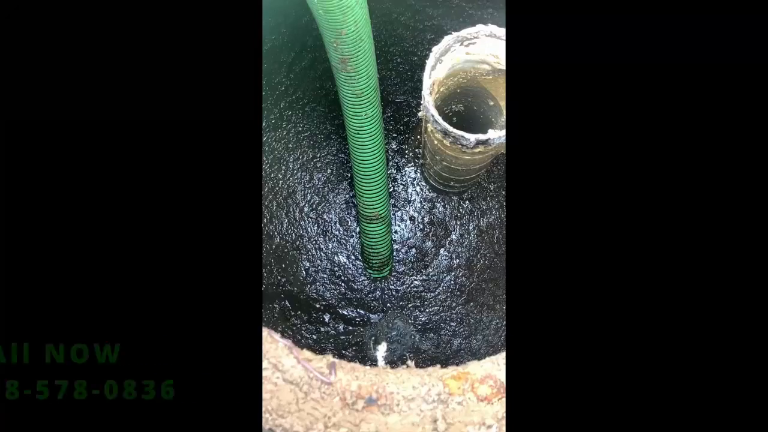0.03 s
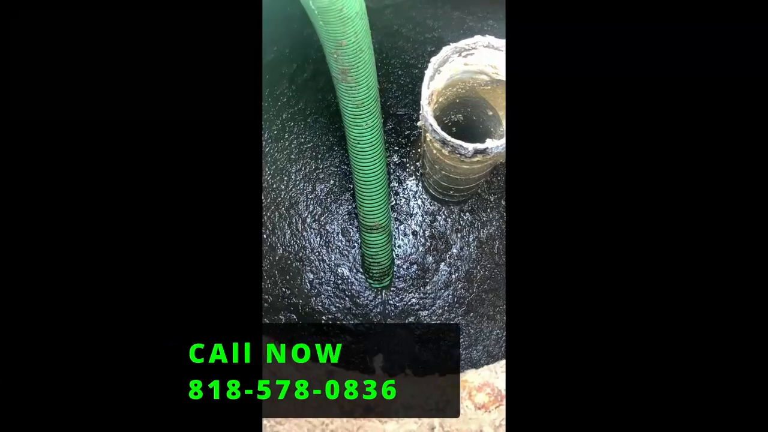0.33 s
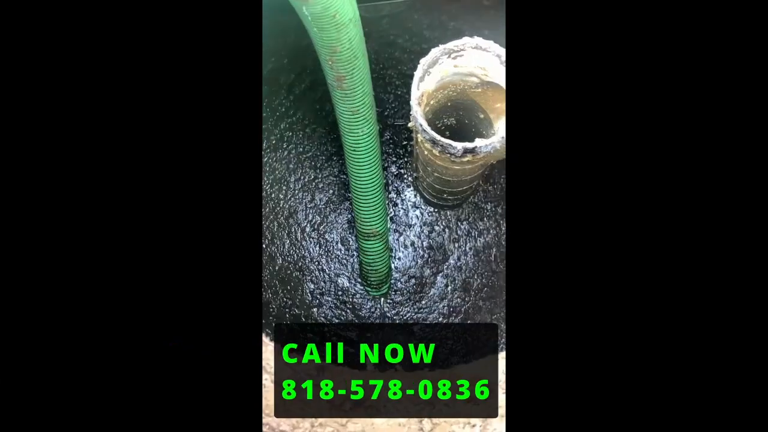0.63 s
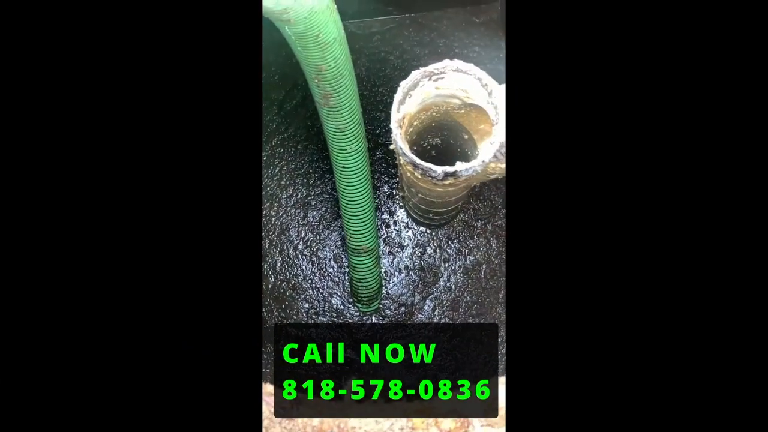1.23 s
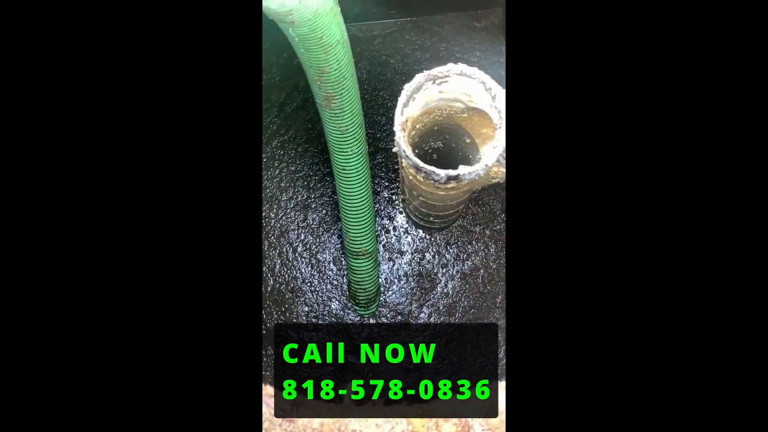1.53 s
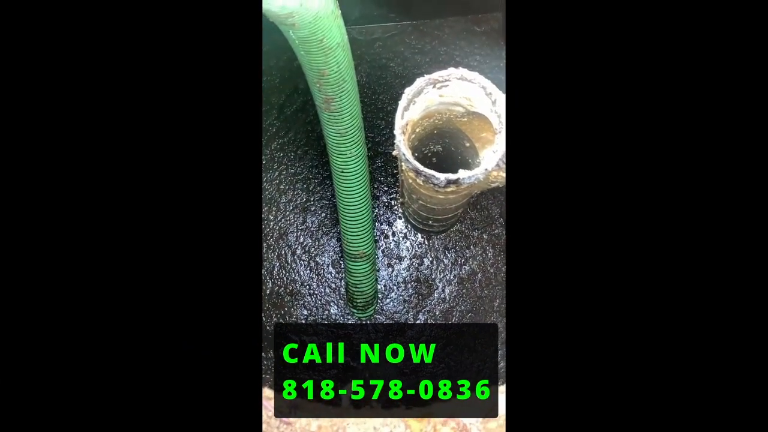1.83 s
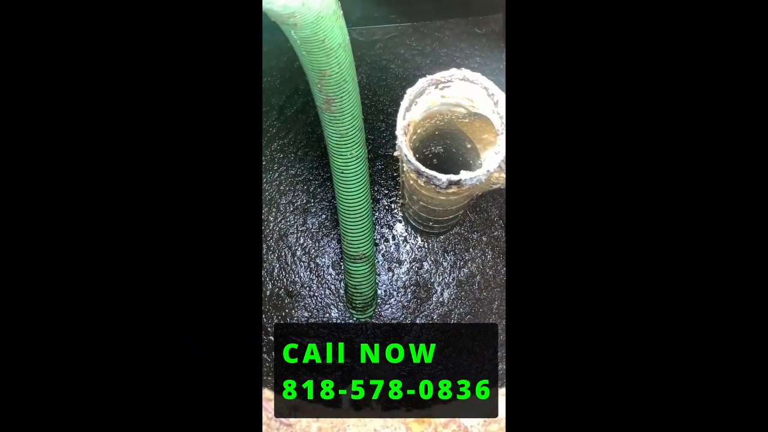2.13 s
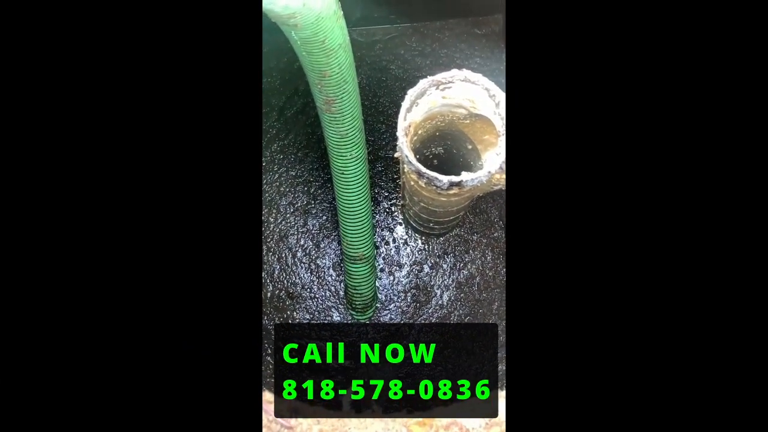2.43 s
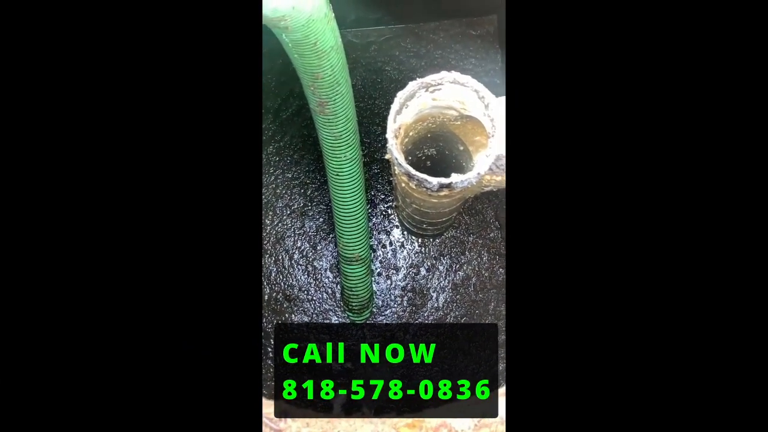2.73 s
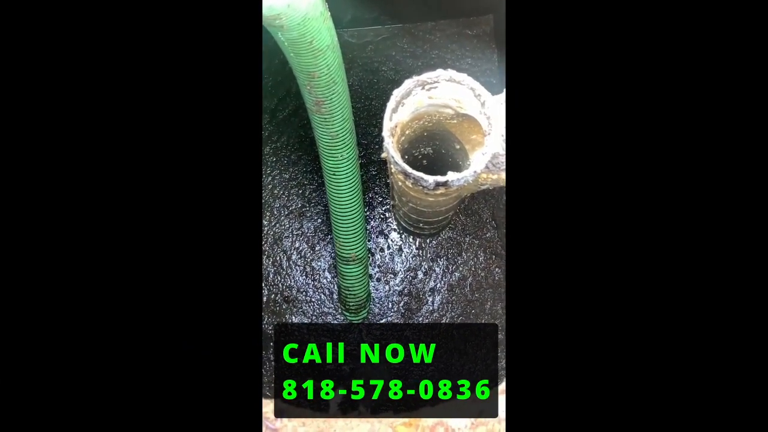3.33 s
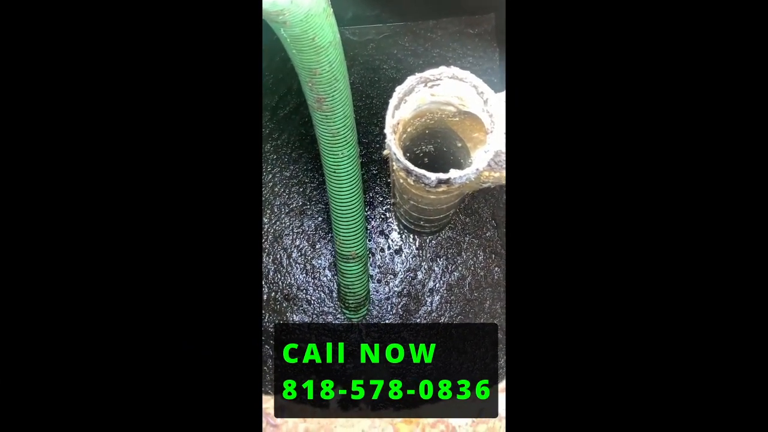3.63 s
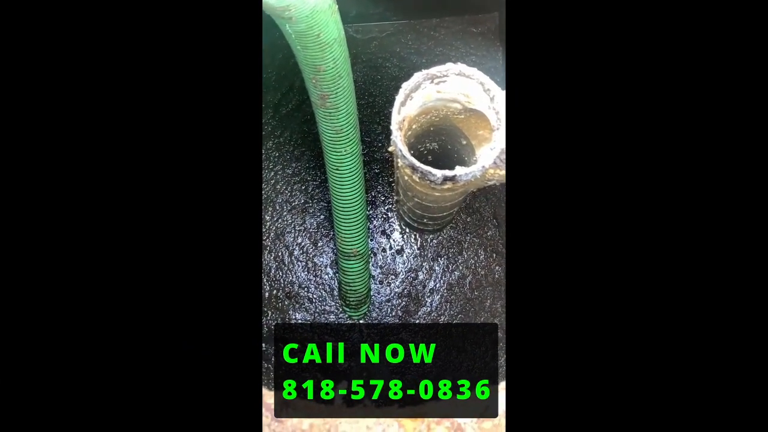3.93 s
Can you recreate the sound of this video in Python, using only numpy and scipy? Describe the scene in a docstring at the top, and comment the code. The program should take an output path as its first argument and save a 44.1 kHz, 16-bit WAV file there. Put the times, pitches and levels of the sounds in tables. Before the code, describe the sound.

Loud, steady vacuum pump drone with a thin whine and faint wet slurping from a hose.

```python
"""First comes the loud hum of a vacuum truck's six-vane pump, with a thin metallic whine above it.
The truck is emptying a tank through a hose, heard at the tank's rim. Its engine holds a fast idle
and drives the pump, whose vanes chop the air and set the casing ringing. A second engine idles
slower and beats against the first in the bass. At the hose, air and sludge hiss, crackle and
slurp, and tiny bubbles burst."""
import sys
import numpy as np
from scipy import signal
from scipy.fft import rfft, irfft, next_fast_len
from scipy.io import wavfile
from scipy.ndimage import uniform_filter1d, map_coordinates

SR = 44100
rng = np.random.default_rng(int(sys.argv[2]) if len(sys.argv) > 2 else 0)


def transcribe(signal):
    """Save signal, clipped to [-1, 1], as a 16-bit WAV file at the path in sys.argv[1]."""
    frames = np.atleast_2d(signal).T
    limited = np.clip(frames, -1, 1)
    pcm = np.round(limited * 32767).astype(np.int16)
    wavfile.write(sys.argv[1], SR, pcm)


N = 176400

SHAFT_HZ, SLOW_CYCLE_HZ = 32.797, 10.203  # the truck's shaft, the slower engine's cycle
VANES, FIRINGS = 6, 3  # per turn of the shaft


def amp(db):
    """Decibels to gain."""
    return 10 ** (np.asarray(db) / 20)


def unit(x):
    """Scale to rms 1."""
    return x / np.sqrt(np.mean(x ** 2) + 1e-20)


def along(points, hz):
    """Read (f/Hz, value) breakpoints on a log frequency axis."""
    f, values = np.transpose(points)
    return np.interp(np.log(hz + 1), np.log(f + 1), values)


def clock():
    """Seconds at each sample."""
    return np.arange(N) / SR


def ride(points):
    """A fader ride: the gain at each sample from (t/s, level/dB) breakpoints."""
    return amp(np.interp(clock(), *np.transpose(points)))


def wobble(per_s):
    """Smooth random modulation with per_s knots a second."""
    knots = rng.standard_normal(int(N * per_s / SR) + 4)
    return map_coordinates(knots, [clock() * per_s], mode="nearest")


def filtered(x, response):
    """EQ x with a response given as a function of frequency."""
    size = next_fast_len(N + SR // 4)
    return irfft(rfft(x, size) * response(np.fft.rfftfreq(size, 1 / SR)), size)[..., :N]


# Stereo width of the noisy layers: f/Hz, left-right correlation
CORRELATION = [(100, .995), (250, .97), (400, -.1), (640, -.25), (1020, -.2), (2600, -.3), (4200, -.2),
               (6700, .15), (8500, .45), (10800, .25)]
def mid_side(hz):
    """Mid and side gains: nearly mono in the bass, wide above."""
    turn = np.arccos(np.clip(along(CORRELATION, hz), -1, 1)) / 2
    return np.array([np.cos(turn), np.sin(turn)])


# Panning of the noisy layers: f/Hz, left minus right/dB
PAN = [(60, 3.5), (190, -8.5), (380, -9), (600, -1), (900, 0), (1900, 0.5), (10000, 0)]
def pan_gains(hz):
    """Left and right gains: the low mids lean right."""
    return amp(np.outer([.5, -.5], along(PAN, hz)))


def spread(pair, eq):
    """Colour two unrelated signals and blend them into stereo, rms 1."""
    mid, side = filtered(pair, lambda hz: amp(along(eq, hz)) * mid_side(hz))
    return unit(filtered(np.array([mid + side, mid - side]), pan_gains))


def rush(eq):
    """Coloured stereo noise of rms 1."""
    return spread(rng.standard_normal((2, N)), eq)


def rotation(hz, hunt, jitter):
    """Angle of a governed shaft that hunts slowly and jitters a little (radians)."""
    return 2 * np.pi * hz * clock() + hunt * wobble(per_s=3) + jitter * wobble(per_s=30)


def tones(angle, rate_hz, partials, flutter_db, fade_db, lead=1):
    """Partials of a rotation; the high ones flutter and fade. Positive lead puts the left ahead."""
    in_step_below_hz, full_flutter_hz, full_fade_hz = 70, 850, 3200
    out = np.zeros((2, N))
    for order, left_db, right_db, correlation in partials:
        hz = order * rate_hz
        start = rng.uniform(-np.pi, np.pi) * (hz > in_step_below_hz)  # the engines' bass starts in step
        offset = lead * np.arccos(correlation) / 2
        flutter = flutter_db * min(1, (hz / full_flutter_hz) ** 2) * wobble(per_s=14)
        fade = fade_db * min(1, hz / full_fade_hz) * wobble(per_s=2)
        gain = unit(amp(flutter + fade))
        out[0] += amp(left_db) * gain * np.cos(order * angle + start + offset)
        out[1] += amp(right_db) * gain * np.cos(order * angle + start - offset)
    return np.sqrt(2) * out


# Partials of the hum: multiple of the vane rate, left/dB, right/dB, left-right correlation
HUM_PARTIALS = [(1, -21.5, -18.0, 1.0), (2, -36.5, -33.3, -0.7), (3, -43.0, -33.0, -0.7),
                (4, -44.0, -44.0, -0.9), (5, -47.5, -57.5, -0.7), (6, -44.0, -42.5, 0.4),
                (7, -49.0, -58.0, -0.9), (8, -50.0, -54.5, 1.0), (9, -61.5, -61.0, -0.3),
                (10, -52.5, -55.5, -0.7), (11, -67.5, -61.5, 0.4), (12, -61.0, -65.5, -0.7),
                (13, -68.0, -69.0, 0.5), (14, -63.0, -66.0, -0.8), (15, -62.0, -62.0, -0.9),
                (16, -65.0, -64.0, 0.5), (17, -60.5, -60.5, -1.0), (18, -65.5, -65.5, -1.0),
                (19, -63.0, -60.0, -0.9), (20, -67.5, -68.0, -1.0), (22, -62.5, -64.0, -1.0),
                (23, -63.5, -64.0, 0.9), (25, -70.0, -66.0, -0.9), (26, -59.0, -59.5, -0.5),
                (28, -60.0, -62.0, -0.3), (29, -66.0, -71.5, -1.0)]
def pump_hum(angle):
    """The vanes chop the air into a loud hum with overtones."""
    return tones(VANES * angle, VANES * SHAFT_HZ, HUM_PARTIALS, flutter_db=2.5, fade_db=0, lead=-1.016)


# Metal resonances of the pump casing: f/Hz, width/Hz, level/dB
CASING_MODES = [(1385, 50, -53), (2230, 25, -59), (2830, 110, -59.5), (3342, 20, -62.5), (3410, 50, -65),
                (4340, 50, -62), (4500, 80, -61), (5116, 25, -66), (5540, 90, -63), (6720, 120, -67),
                (7810, 80, -70)]
def casing_whine(flicker_db=1.7):
    """A thin metallic whine: narrow resonances flicker as the air excites them."""
    out = np.zeros((2, N))
    for hz, width, db in CASING_MODES:
        air = rng.standard_normal((2, N))
        ring = filtered(air, lambda f: (1j * f * width / (hz * hz - f * f + 1j * f * width)) ** 2)
        out += amp(db + flicker_db * wobble(per_s=14)) * unit(ring)
    return out


# EQ of the engine's roar: f/Hz, relative level/dB
ROAR_EQ = [(120, -14), (215, -14), (265, -0.5), (330, 1.1), (400, -4), (445, -7), (520, 2), (600, 0),
           (640, -4.5), (730, -1.5), (790, -11), (920, -5), (1120, -6.5), (1300, -12), (1500, -12.5),
           (1680, -17), (1830, -14.5), (2500, -24.5), (4000, -43.5), (9000, -43)]
def engine_roar(angle, level_db=-32):
    """Midrange noise that swells with every firing."""
    firing = 1 + 0.13 * np.cos(FIRINGS * angle) + .06 * np.cos(angle)
    return amp(level_db + 1.1 * wobble(per_s=12)) * unit(firing * rush(ROAR_EQ))


# Engine and gear partials: multiple of the shaft rate, left/dB, right/dB, left-right correlation
ENGINE_PARTIALS = [(1, -56.5, -56.0, 1.0), (2, -38.5, -37.0, 1.0), (4, -50.0, -46.0, 1.0),
                   (5, -54.5, -49.5, 1.0), (8, -50.5, -49.5, 1.0), (11, -53.5, -48.0, 1.0),
                   (13, -67.0, -50.0, 1.0), (14, -53.0, -54.0, -0.9), (16, -50.5, -59.0, -1.0),
                   (17, -52.5, -58.0, 0.5), (23, -57.5, -51.0, 0.8), (28, -52.5, -55.5, -0.9),
                   (31, -56.5, -53.0, 0.2), (32, -52.0, -52.0, -0.4), (33, -41.5, -42.5, -0.5),
                   (34, -50.0, -46.5, -0.1), (35, -54.0, -53.5, -0.8), (37, -57.0, -66.5, -0.9),
                   (38, -54.0, -56.0, -1.0), (39, -57.5, -58.5, -0.3), (43, -57.0, -57.0, -0.9),
                   (64, -66.0, -64.0, 0.1), (68, -51.5, -52.5, -0.6), (88, -64.0, -59.5, -0.1),
                   (135, -66.0, -80.5, -0.9), (136, -62.5, -64.0, 0.9), (169, -66.0, -65.5, 0.6),
                   (170, -65.0, -62.5, 0.8), (237, -73.0, -73.5, 1.0), (238, -67.0, -67.0, 1.0),
                   (240, -73.0, -73.0, 1.0)]
def engine_drone(angle):
    """The engine and its gears sing at multiples of the shaft rate."""
    return tones(angle, SHAFT_HZ, ENGINE_PARTIALS, flutter_db=2.0, fade_db=1.5)


# Contour of the engine's many weak half orders: f/Hz, typical level of one partial/dB
CLATTER_EQ = [(60, -63), (250, -60), (500, -59), (800, -63), (1150, -61), (1700, -69), (2800, -72),
              (4500, -73), (6000, -79), (9000, -86)]
def engine_clatter(angle, scatter_db=2, size=16384):
    """Valves and injectors loop the same rattle every two turns, filling in between the strong tones."""
    orders = np.arange(1, size // 32) / 2
    hz = orders * SHAFT_HZ
    between = ~np.isin(orders, [row[0] for row in ENGINE_PARTIALS]) & (orders % VANES > 0)
    gains = between * amp(along(CLATTER_EQ, hz) + scatter_db * rng.standard_normal((2, len(hz))))
    phasors = np.exp(2j * np.pi * rng.random((2, len(hz))))
    mid, side = gains * phasors * mid_side(hz)
    spectra = np.array([mid + side, mid - side]) * pan_gains(hz)
    loops = [irfft(np.r_[0, spectrum], size) for spectrum in spectra]
    playhead = angle / (4 * np.pi) % 1 * size
    return np.array([np.interp(playhead, np.arange(size), loop) for loop in loops]) * size / np.sqrt(2)


# EQ of the exhausts: f/Hz, relative level/dB
EXHAUST_EQ = [(20, -31), (35, -23), (50, -5), (70, 2.5), (100, 1), (130, 5), (150, -2), (175, -4.5),
              (205, -1.5), (235, -8), (350, -23), (800, -46)]
def exhaust_rumble(level_db=-37):
    """The exhausts lay down a steady bed of low noise."""
    return amp(level_db) * rush(EXHAUST_EQ)


# Moving EQ bands on the whines: centre f/Hz, half width/Hz, ride of (t/s, level/dB)
WHINE_RIDES = [(2080, 260, [(.1, -2), (.45, 1), (.8, -1), (1.15, 0), (1.7, 1), (2.35, 0), (3.0, 0),
               (3.45, -0.5), (4, 1.5)]), (3300, 83, [(.32, -2), (.45, 0), (1.3, -2), (1.8, 0), (2.2, 1),
               (2.6, 1), (2.76, 3), (2.97, 7), (3.07, -3), (3.4, 1), (3.55, -3), (3.7, 1), (4, -1)]),
               (4520, 160, [(.3, -2), (.45, 2.5), (.75, 2), (1.2, -1), (1.6, 1.5), (1.8, -0.5), (2.3, -1.5),
               (2.5, 1), (3.0, 1.5), (3.4, 4.5), (4, 0)]), (5116, 54, [(.3, 1), (.6, -6), (.9, 0),
               (1.28, 5), (1.48, -3), (1.7, 3), (2.1, 0), (2.5, 1), (2.75, -1), (3.2, 7.5), (3.7, 1)]),
               (5500, 100, [(.1, -2), (.45, 4), (.58, -3), (.85, -6), (1.2, 2), (1.75, 2), (2.05, 2),
               (2.35, -2), (2.7, 2), (3.3, 0), (3.45, 2), (3.77, -5), (3.9, 2)]), (7850, 80, [(.1, -2),
               (.7, -1), (1.3, 2), (2.0, -3), (2.35, 4.5), (2.75, 1), (3.0, -4), (4, -2)])]
def swell_whines(truck):
    """Each whine swells and fades on its own as the listener moves."""
    out = truck.copy()
    for hz, width, levels in WHINE_RIDES:
        band = filtered(truck, lambda f: np.exp(-((f - hz) / width) ** 4))
        out += (ride(levels) - 1) * band
    return out


# Slower engine's partials: multiple of its cycle rate, left/dB, right/dB, left-right correlation
THROB_PARTIALS = [(6, -31.5, -30.5, 1.0), (7, -52.5, -51.0, 1.0), (8, -47.0, -45.0, 1.0),
                  (9, -47.5, -45.5, 1.0), (12, -42.5, -40.0, 1.0), (13, -53.0, -49.5, 1.0),
                  (15, -52.0, -49.0, 1.0), (27, -53.5, -49.0, 0.7), (30, -51.5, -50.0, 0.9),
                  (32, -55.0, -51.0, 0.9), (36, -53.5, -53.5, 1.0), (37, -58.5, -50.5, 1.0),
                  (38, -58.0, -47.5, 0.7), (39, -54.5, -47.5, 1.0), (46, -50.0, -48.0, 1.0),
                  (49, -53.0, -61.0, 1.0), (54, -65.5, -50.5, 0.9), (60, -52.5, -53.5, 0.3),
                  (74, -66.5, -64.5, 0.1), (84, -62.0, -52.0, 0.6)]
def slow_engine():
    """A low throb a few hertz under the truck's second order, beating against it."""
    angle = rotation(SLOW_CYCLE_HZ, hunt=0.012, jitter=0.0049)
    return tones(angle, SLOW_CYCLE_HZ, THROB_PARTIALS, flutter_db=2, fade_db=2.5)


def boil(noise, depth_db=1.8):
    """A boiling texture: patches a few hundred hertz wide come and go at random."""
    spectra = signal.stft(noise, nperseg=512)[2]
    patches = uniform_filter1d(rng.standard_normal(spectra.shape[1:]), size=4, axis=0)  # across pitch
    patches = uniform_filter1d(patches, size=12, axis=1)  # across time
    return unit(signal.istft(spectra * amp(depth_db * unit(patches)), nperseg=512)[1][:, :N])


# EQ of the suction hiss: f/Hz, relative level/dB
HISS_EQ = [(800, -49), (2000, 3), (3000, 1), (3900, 2), (4450, 2), (4900, -3.2), (5600, -9), (6100, -3.5),
           (7600, -2.5), (8600, -6), (9400, -8), (10200, -10), (11000, -16.5)]
# Fader ride on the suction hiss: t/s, relative level/dB
HISS_RIDE = [(0, 1.8), (.55, -0.5), (.8, -0.5), (1.05, 0.5), (1.25, 1.3), (1.5, 0.5), (2.15, -.5),
             (2.6, .4), (2.95, 0), (3.25, -0.7), (3.42, 0.5), (3.62, 0.5), (3.74, -1.3), (3.85, -0.5),
             (4, -.5)]
def suction_hiss(angle, level_db=-47):
    """Air rushes into the hose with a boiling hiss that pulses lightly with the shaft."""
    suction = ride(HISS_RIDE) * amp(level_db + 0.94 * wobble(per_s=25))
    pulse = 1 + 0.07 * np.cos(angle)
    return suction * pulse * boil(rush(HISS_EQ))


# EQ of the wet pops: f/Hz, relative level/dB
POP_EQ = [(1500, -13), (4000, -8), (6500, 0), (8500, -1), (11000, -2)]
def sludge_pops(per_s=600):
    """Sludge crackles at the hose in fine random clicks, rms 1."""
    clicks = rng.standard_normal((2, N)) * (rng.random(N) < per_s / SR)
    return spread(clicks, POP_EQ)


# EQ of the spray before each slurp colours it: f/Hz, relative level/dB
SPRAY_EQ = [(1500, 3), (7000, -3.5), (11000, -4.5)]
# Slurp cues, bell-shaped in time and pitch: peak t/s, half length/s, level/dB, f/Hz, half width/octaves
SLURP_CUES = [(0.203, 0.031, -58, 9100, .25), (0.801, 0.044, -51, 7000, .45), (0.86, 0.1, -51, 3170, 0.42),
              (0.927, 0.033, -54, 6500, .5), (1.404, 0.027, -55, 8260, 0.2), (1.605, .025, -53, 6000, .35),
              (1.749, .015, -50.5, 7700, 0.48), (1.76, .06, -50, 6540, 0.22),
              (1.954, 0.033, -49, 5500, 0.65), (2.011, 0.015, -48, 3240, 0.37),
              (2.06, 0.018, -55, 6600, .15), (2.303, .03, -56, 7500, .35), (2.616, .04, -59.5, 8000, .35),
              (2.77, .035, -54, 6500, .45), (3.465, .045, -51, 5800, .45), (3.84, 0.016, -56, 10100, 0.26),
              (3.91, .03, -59, 9100, .2)]
def hose_slurps(pops):
    """Air and sludge sputter in brief swells of spray and pops, each with its own colour."""
    spray = boil(rush(SPRAY_EQ)) + 0.5 * pops
    out = np.zeros((2, N))
    for peak_s, half_length, db, hz, octaves in SLURP_CUES:
        band = unit(filtered(spray, lambda f: np.exp(-.5 * (np.log2((f + 1) / hz) / octaves) ** 2)))
        swell = np.exp(-.5 * ((clock() - peak_s) / half_length) ** 2)
        out += amp(db) * swell * band
    sputter = amp(1.9 * wobble(per_s=45))
    return sputter * out


def bubbles(count=260, typical_db=-47, typical_hz=5500, decay_cycles=30, size=2048):
    """Tiny bubbles burst in the sludge as damped pings, about half in the slurps, the rest at any time."""
    out = np.zeros((2, N + size))
    t = np.arange(size) / SR
    draws = np.c_[rng.random((count, 3)), rng.standard_normal((count, 3)).clip(-2, 2)]
    for pick, place, pan, scatter, pitch, loudness in draws:
        peak_s, half_length = SLURP_CUES[int(place * len(SLURP_CUES))][:2]
        start = (peak_s + scatter * half_length) * SR if pick < .5 else place * N
        start = int(np.clip(start, 0, N - 1))
        cycles = typical_hz * 2 ** (pitch / 2) * t
        ping = amp(typical_db + 2 * loudness) * np.sin(2 * np.pi * cycles) * np.exp(-cycles / decay_cycles)
        out[:, start:start + size] += np.outer(np.sqrt([pan, 1 - pan]), ping)
    return out[:, :N]


# Ride on the machines, a little louder as the listener leans over the tank: t/s, relative level/dB
MACHINE_RIDE = [(0, -1), (.6, -0.5), (1.3, -0.5), (2, 0.5), (3, -0.5), (4, 0)]
def scene(crackle_db=-63):
    """The mix: pump and engine on one shaft, the slower engine beside them, and the hose."""
    angle = rotation(SHAFT_HZ, hunt=0.0086, jitter=0.0036)
    pump = pump_hum(angle) + casing_whine()
    engine = engine_roar(angle) + engine_drone(angle) + engine_clatter(angle) + exhaust_rumble()
    machines = ride(MACHINE_RIDE) * (swell_whines(pump + engine) + slow_engine())
    hiss = suction_hiss(angle)
    pops = sludge_pops()
    crackle = amp(crackle_db + 1.6 * wobble(per_s=14)) * pops
    return machines + hiss + crackle + hose_slurps(pops) + bubbles()


def record(dry, start_s=0.07, attack_s=0.0013, top_hz=11300):
    """The sound cuts in abruptly, under a brick-wall low-pass."""
    gate = np.clip((clock() - start_s) / attack_s, 0, 1)
    return filtered(dry * gate, lambda hz: hz < top_hz)


dry = scene()
out = record(dry)
transcribe(out)
```